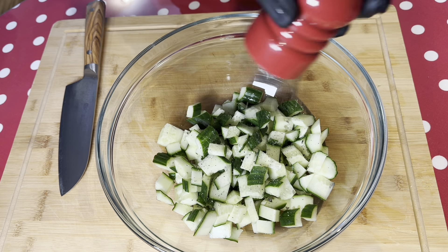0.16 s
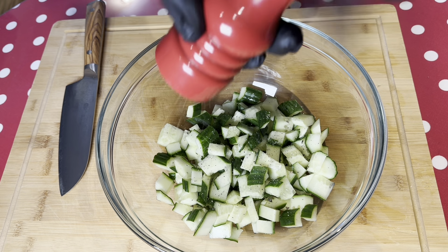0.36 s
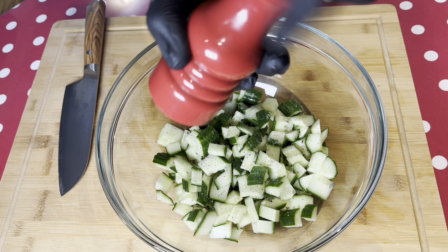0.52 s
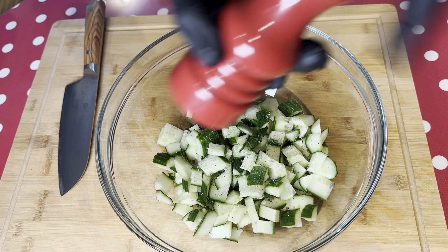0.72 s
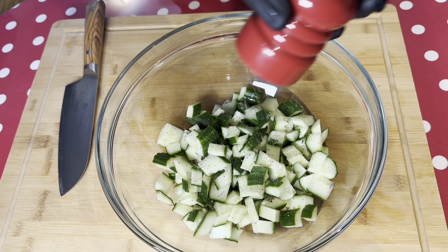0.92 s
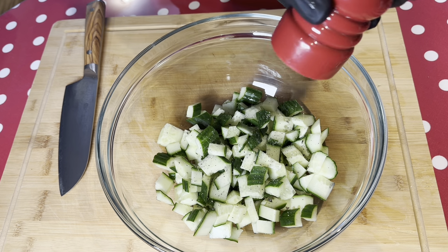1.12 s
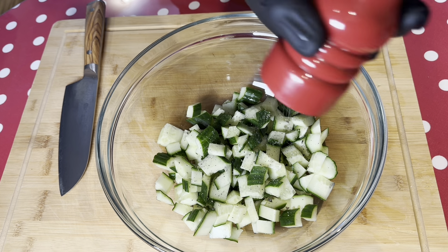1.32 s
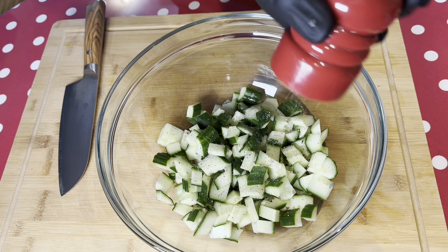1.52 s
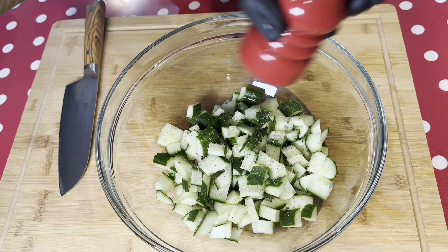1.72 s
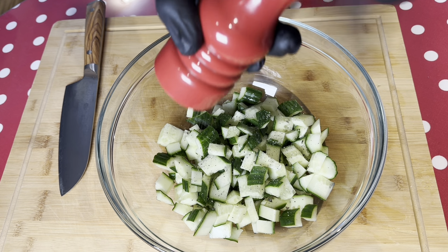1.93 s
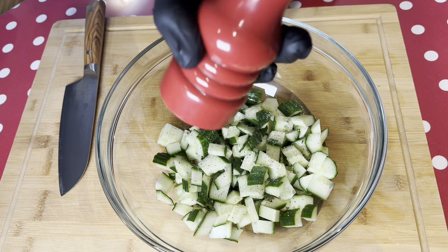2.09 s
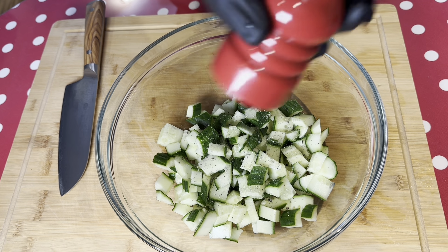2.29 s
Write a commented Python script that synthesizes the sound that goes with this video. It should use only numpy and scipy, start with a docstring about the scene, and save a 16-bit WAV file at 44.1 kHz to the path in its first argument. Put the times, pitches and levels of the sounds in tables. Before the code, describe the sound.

Close to the microphone, a pepper mill grinds in a quick, even run of about eight crunches, with a sharper crack near the start and another near the end. Ground pepper patters faintly in a quiet kitchen.

```python
"""A hand pepper mill is twisted back and forth over a bowl, close by in a kitchen, about 3 strokes/s.
It opens as one stroke ends; eight more follow. In each the burr bites, crushes peppercorns in a
dense crunch and lets go. Whole corns crack and ring the mill, loudest at 0.25 s and 2.05 s.
After each stroke the patter of ground pepper swells slightly. Throughout, the hands thud softly
on the mill and the room answers briefly over a faint rumble and hiss."""
import sys
import numpy as np
from scipy import signal
from scipy.fft import rfft, irfft, next_fast_len
from scipy.io import wavfile
from scipy.ndimage import map_coordinates

SR = 44100
rng = np.random.default_rng(int(sys.argv[2]) if len(sys.argv) > 2 else 0)


def dump_mix(stems):
    """Bounce the given channels to the path in sys.argv[1] as a 16-bit WAV at rate SR."""
    frames = np.atleast_2d(stems).T  # one column per channel
    limited = np.clip(frames, -1, 1)  # hard clip at full scale
    pcm = np.round(limited * 32767).astype(np.int16)
    wavfile.write(sys.argv[1], SR, pcm)


N = 103635
T = np.arange(N) / SR

# strokes: bite t/s, full pressure t/s, release t/s, level/dB,
# then relative: first bite/dB, bass/dB, treble/dB, burr ring/dB, left over right/dB
STROKES = [(-0.12, -0.06, 0.0084, -48, -12, -8, 2.5, 1.5, 4),
           (0.127, 0.205, 0.31, -47.5, -19.5, -1, 5.5, -4, 2),
           (0.483, 0.555, 0.590, -42, -9, -1.5, 0.5, -10, 3.5),
           (0.787, 0.830, 0.89, -38.5, -8.5, 1, -3, -16, 1.5),
           (1.076, 1.160, 1.2, -39.5, -20, -1, -1, -8.5, 1.5),
           (1.395, 1.478, 1.529, -44.5, -12, 2.5, 0, -12, 1),
           (1.700, 1.798, 1.825, -40.5, -17, 3, -1, -14, 2.5),
           (2.020, 2.062, 2.112, -42, -13.5, 0.5, 0.5, -7.5, 2.5),
           (2.295, 2.335, 2.34, -42.5, -26.5, 2, -0.5, -7, 2)]
# corns cracking: t/s, length/s, dull knock/dB, crack/dB, burr ring/dB, bright snap/dB
CRACKS = [(0.1327, 0.0047, -62, -68, -68, -50), (0.1445, .003, -59, -64, -57, -48),
          (0.1620, 0.0022, -75, -68, -51, -45), (0.184, 0.0043, -63, -51, -44, -44),
          (0.2486, 0.0045, -40, -21.5, -17, -22.5), (0.4490, 0.0078, -59, -56.5, -73, -54.5),
          (0.46, 0.0032, -74, -70, -60, -50.5), (0.5256, 0.0055, -42.5, -35, -28, -32),
          (0.5324, 0.0054, -36.5, -30, -42, -31.5), (0.5750, 0.0039, -26.5, -34.5, -33, -46),
          (0.5850, 0.0024, -52, -42, -38, -54), (0.61, 0.0015, -69, -48, -36.5, -42),
          (0.7750, 0.0018, -82, -68, -49, -51), (0.7935, 0.0043, -58, -40.5, -46.5, -62),
          (0.851, 0.0037, -44, -39, -47, -60), (0.885, .003, -53, -39.5, -55, -45),
          (1.0780, 0.0079, -62, -51, -54, -46.5), (1.111, 0.0072, -58, -55.5, -50, -47),
          (1.115, 0.0065, -68, -51, -55, -44), (1.1520, 0.0021, -31.5, -32.5, -33, -45),
          (1.2790, 0.0042, -52, -69, -70, -71), (1.1900, 0.0021, -50, -54, -41, -48),
          (1.3805, 0.0049, -61, -47, -50.5, -48), (1.4154, 0.0041, -53, -49, -40, -36.5),
          (1.4212, 0.0037, -55, -54, -41, -37.5), (1.4806, 0.0042, -43, -43, -38, -47),
          (1.512, 0.0025, -68, -48, -40, -41), (1.56, 0.0016, -45, -47, -66, -66),
          (1.6830, 0.011, -50.5, -51, -61, -61), (1.6887, 0.005, -41, -40, -57, -59),
          (1.698, 0.0062, -52, -61, -53, -44.5), (1.7320, 0.0017, -59, -48, -58, -55),
          (1.7465, 0.0032, -56, -44, -64, -63), (2.0136, 0.0033, -47, -52, -68, -69),
          (2.0393, 0.0041, -50, -48, -49, -42), (2.047, 0.0035, -35, -26.5, -25, -23.5),
          (2.0555, .003, -51, -49, -33, -34), (2.1048, 0.0033, -34, -47, -56, -56),
          (2.277, 0.0067, -60, -63.5, -62, -54.5), (2.3315, 0.0058, -48.5, -40.5, -58, -56)]
# grip shifts: t/s, level/dB
GRIPS = [(0.045, -68.5), (0.135, -66), (0.261, -46.5), (0.451, -64.5), (0.520, -62), (0.578, -52.5),
         (0.625, -69), (0.765, -62.5), (1.395, -61), (1.560, -61.5), (1.721, -54), (1.815, -56.5),
         (1.865, -65), (1.929, -74), (2.010, -61), (2.120, -62), (2.279, -59), (2.327, -58)]
# mill resonances: f/Hz, width/Hz, lift/dB
MILL_MODES = [(219, 50, 5), (508, 160, 3), (1192, 51, 7.5), (1580, 43, 0.5), (1950, 120, 2.5),
              (2244, 97, 4.5), (2804, 280, 4.5), (4050, 230, 5), (4800, 160, 2.5), (5260, 150, 5.5),
              (6165, 240, 5), (6360, 64, 5.5)]
# spectra: f/Hz, level/dB
CRUNCH_EQ = [(40, -23), (110, -20.5), (200, -3), (400, -1.5), (1000, -3.5), (2400, -2.5), (3400, -5),
             (4500, -4), (7000, -10), (11000, -12), (14500, -7)]
KNOCK_EQ = [(50, -23.5), (130, -12.5), (250, 0.5), (500, -4), (1100, 1), (1800, -12.5), (5000, -37),
            (15000, -64)]
CRACK_EQ = [(100, -23), (600, -8.5), (1700, 0.5), (2800, -3.5), (5000, -8.5), (15000, -27.5)]
RING_EQ = [(200, -29.5), (3000, -24), (3700, -11), (4050, 4), (4600, -2.5), (6500, -15), (15000, -35)]
SNAP_EQ = [(200, -30), (3000, 1.5), (5500, -2), (8300, 0.5), (11000, -3), (14500, -1.5)]
THUD_EQ = [(20, -50), (50, -12), (100, -4.5), (180, -8), (300, -2.5), (1000, -48), (15000, -76)]
PATTER_EQ = [(200, -24), (2000, -3), (5000, -5.5), (8000, -2.5), (11000, 1.5), (14500, -2.5)]
FLOOR_EQ = [(20, -38), (35, -18), (55, -1.5), (110, -8.5), (250, -5.5), (1000, -14.5), (4000, -16),
            (15000, -21.5)]
# kitchen decay: f/Hz, T60/s
KITCHEN_T60 = [(150, 0.32), (1000, .27), (4000, 0.29), (8000, 0.31), (15000, 0.19)]
# phase lead of left over right: f/Hz, phase/rad
LEFT_LEAD = [(100, 0), (2000, 0.59), (2700, 0.93), (4100, 0.63), (6000, 0.044), (6900, -1.13),
             (7700, -0.64)]

TOP_HZ = 15800


def crunch(release_db_per_s=537, coast_db=-25.5, coast_db_per_s=62, rub_db=-2, clumps_per_s=260,
           bass_hz=470, treble_hz=3130):
    """Pressure builds, holds and drops each stroke; fragments break under the burr and its teeth ring."""
    bass, middle, treble, burr = np.zeros((4, N))
    for bite_s, full_s, release_s, db, bite_db, bass_db, treble_db, burr_db, _ in STROKES:
        after_s = np.maximum(T - release_s, 0)
        stop = amp(-release_db_per_s * after_s) * (1 - amp(coast_db))
        coast = amp(coast_db - coast_db_per_s * after_s)  # loose bits scrape on
        pressure = (T >= bite_s) * amp(np.interp(T, [bite_s, full_s], [bite_db, 0])) * (stop + coast)
        bass += amp(db + bass_db) * pressure ** 1.22  # low crunch needs more pressure
        middle += amp(db) * pressure
        treble += amp(db + treble_db) * pressure
        burr += amp(db + burr_db) * pressure
    fragments = grains(per_s=2200, spread_db=3)
    rubbing = amp(rub_db) * rng.standard_normal(N)
    breaks = (fragments + rubbing) / np.hypot(1, amp(rub_db))
    # fragments break in clumps that differ in size, then in colour
    breaks *= amp(1.03 * wobble(clumps_per_s))
    bass, middle, burr = (band * amp(2 * wobble(clumps_per_s)) for band in (bass, middle, burr))
    force = breaks * middle
    force += filtered(breaks * (bass - middle), lambda hz: 1 / (1 + (hz / bass_hz) ** 2))
    force += filtered(breaks * (treble - middle), lambda hz: hz ** 4 / (hz ** 4 + treble_hz ** 4))
    teeth = burr * grains(per_s=1500, spread_db=3)
    return mill(force, CRUNCH_EQ) + mill(teeth, RING_EQ)


def cracks():
    """A whole corn gives way in a few ms of splintering that knock and ring the mill."""
    forces = np.zeros((4, N))
    for start_s, length_s, *levels_db in CRACKS:
        age = T[:SR // 20] / length_s
        envelope = (1 - np.exp(-10 * age)) * np.exp(-age ** 2 / 2)
        bursts = amp(levels_db)[:, None] * envelope * rng.standard_normal((4, len(age)))
        span = forces[:, round(start_s * SR):][:, :len(age)]
        span += bursts[:, :span.shape[1]]
    return sum(mill(force, eq) for force, eq in zip(forces, (KNOCK_EQ, CRACK_EQ, RING_EQ, SNAP_EQ)))


def mill(force, eq):
    """A force, coloured by eq, rings the mill's resonances; unit power gain."""
    def response(hz):
        lift_db = sum(db / (1 + (2 * (hz - mode_hz) / width_hz) ** 2)
                      for mode_hz, width_hz, db in MILL_MODES)
        return causal(unit_power(colour(eq, hz) * amp(lift_db), hz))
    return filtered(force, response)


def grips(rise_s=0.01):
    """Soft low thuds as the hands shift on the mill."""
    envelope = np.zeros(N)
    for start_s, db in GRIPS:
        age = np.maximum(T - start_s, 0) / rise_s
        envelope += amp(db) * age * np.exp(1 - age)
    return envelope * filtered(rng.standard_normal(N), lambda hz: colour(THUD_EQ, hz))


def patter(level_db=-60, sway_db=1.3, fall_s=0.08):
    """Ground pepper lands on vegetables and bowl in an uneven shower that swells after each stroke."""
    landings_s = [stroke[2] + fall_s for stroke in STROKES]
    cycle = np.interp(T, landings_s, np.arange(len(landings_s)))
    shower_db = sway_db * (np.cos(2 * np.pi * cycle) + 0.4 * wobble(per_s=25))
    impacts = filtered(grains(per_s=1800, spread_db=2), lambda hz: causal(colour(PATTER_EQ, hz)))
    return amp(level_db + shower_db) * impacts


def kitchen(x, early_db=-11.5, early_t60_s=0.054, tail_db=-11, tail_rise_s=0.0015, apart_hz=330):
    """Quick sideways reflections off the bowl, a short tail off the walls; sides differ above the bass."""
    t = T[:SR // 2]
    mid, side, early = rng.standard_normal((3, N))
    highpass = lambda hz: hz ** 2 / (hz ** 2 + apart_hz ** 2)
    side, early = filtered(np.array([side, early]), highpass)[:, :len(t)]
    hz, age_s, spectra = signal.stft(mid[:len(t)] + np.array([side, -side]), SR, nperseg=256)
    decay = amp(-60 * age_s / log_interp(KITCHEN_T60, hz)[:, None])
    tail = signal.istft(spectra * decay, SR, nperseg=256)[1][:, :len(t)]
    tail *= 1 - np.exp(-(t / tail_rise_s) ** 2)
    early = np.array([early, -early]) * amp(-60 * t / early_t60_s)
    response = amp(tail_db) * tail / np.linalg.norm(tail.mean(0))
    response += amp(early_db) * early / np.linalg.norm(early[0])
    return signal.fftconvolve(x[None], response, axes=1)[:, :N]


def background(gain_db=-70, apart=0.58):
    """Faint rumble and hiss of the room, mostly common to both sides."""
    noise = rng.standard_normal(N) + apart * rng.standard_normal((2, N))
    return amp(gain_db) * filtered(noise, lambda hz: colour(FLOOR_EQ, hz))


def grains(per_s, spread_db):
    """Random impulses of uneven size, rms 1."""
    hits = (rng.random(N) < per_s / SR) * rng.choice([-1, 1], N)
    x = hits * amp(spread_db * np.minimum(rng.exponential(size=N), 3))
    return x / np.sqrt(np.mean(x ** 2))


def wobble(per_s):
    """Smooth random curve, per_s knots a second."""
    return map_coordinates(rng.standard_normal(int(N * per_s / SR) + 4), [T * per_s])


def amp(db):
    """dB to gain."""
    return 10 ** (np.asarray(db) / 20)


def log_interp(points, hz):
    """(f/Hz, value) points interpolated over log frequency."""
    knots_hz, values = np.transpose(points)
    return np.interp(np.log(hz + 1), np.log(knots_hz + 1), values)


def unit_power(gain, hz):
    """Gain scaled to unit mean power, counting only what lies below TOP_HZ."""
    return gain / np.sqrt(np.mean(gain ** 2 * (hz < TOP_HZ)))


def colour(eq, hz):
    """Unit-power gain of a spectrum table."""
    return unit_power(amp(log_interp(eq, hz)), hz)


def causal(gain):
    """Minimum-phase response with this gain: rings only after its cause."""
    cepstrum = irfft(np.log(np.maximum(gain, 1e-6)))
    half = len(cepstrum) // 2
    cepstrum[1:half] *= 2
    cepstrum[half + 1:] = 0
    return np.exp(rfft(cepstrum))


def filtered(x, response):
    """x through the complex response(hz)."""
    size = 2 * next_fast_len(N // 2 + SR // 4)
    return irfft(rfft(x, size) * response(np.fft.rfftfreq(size, 1 / SR)), size)[..., :N]


def scene():
    """The mill sways over the bowl, a little left of centre."""
    grinding = crunch() + cracks()
    pan_db = np.interp(T, [stroke[1] for stroke in STROKES], [stroke[-1] for stroke in STROKES])
    placed = (grinding + kitchen(grinding)) * amp(np.array([pan_db, -pan_db]) / 2)
    mix = placed + grips() + patter() + background()
    return filtered(mix, lambda hz: np.exp(0.5j * np.outer([1, -1], log_interp(LEFT_LEAD, hz))))


def record(dry, shared_hz=7500, lag_from_hz=8050, left_lag_s=0.000331):
    """Both sides share the left's high treble, slightly later on the left; steep cut at TOP_HZ."""
    def lag(hz):
        return np.exp(-1j * np.pi * left_lag_s * np.outer([1, -1], np.maximum(hz - lag_from_hz, 0)))
    lower = filtered(dry, lambda hz: hz < shared_hz)
    shared = filtered(dry[0], lambda hz: (hz >= shared_hz) * lag(hz))
    return filtered(lower + shared, lambda hz: 1 / np.sqrt(1 + (hz / TOP_HZ) ** 240))


dry = scene()
out = record(dry)
dump_mix(out)
```